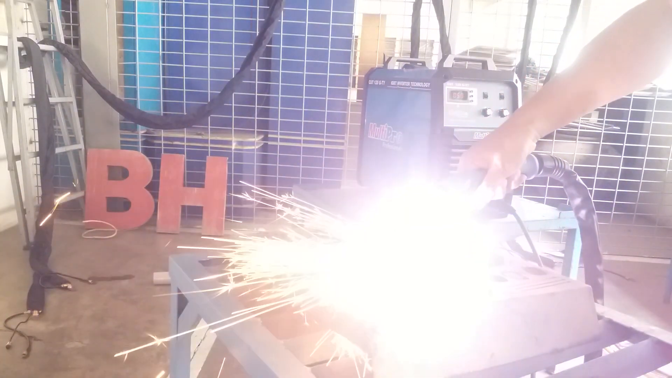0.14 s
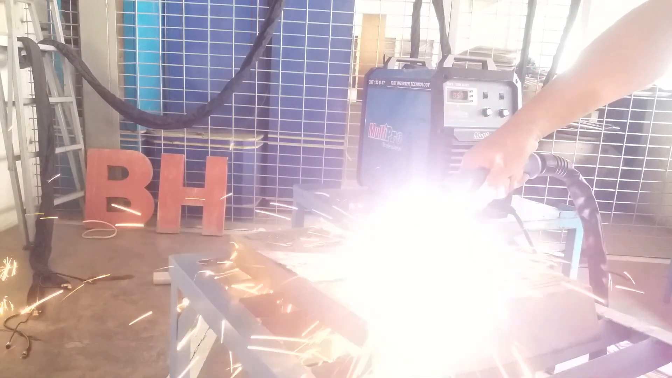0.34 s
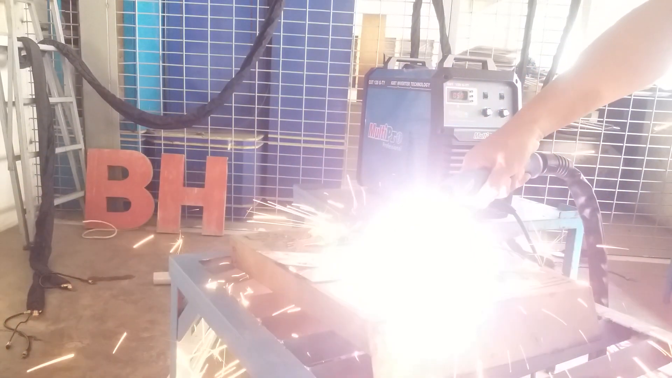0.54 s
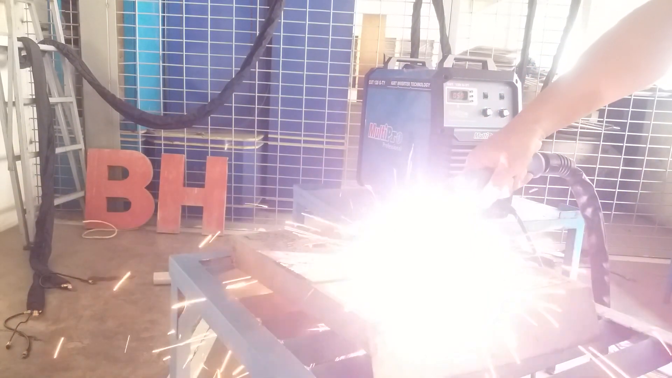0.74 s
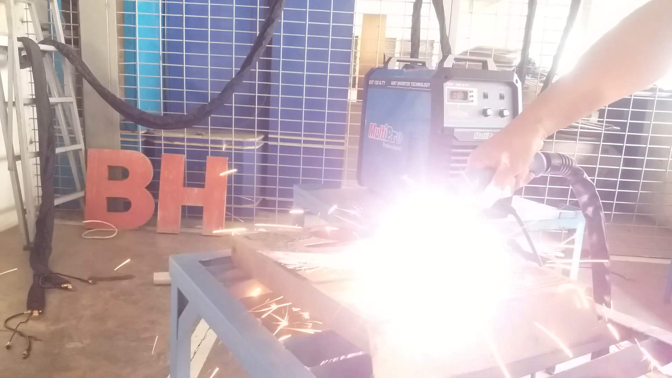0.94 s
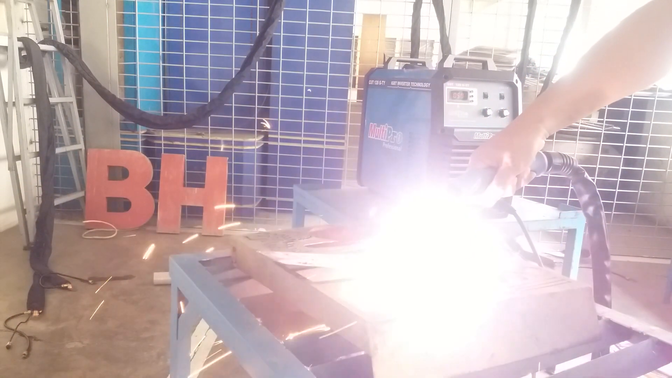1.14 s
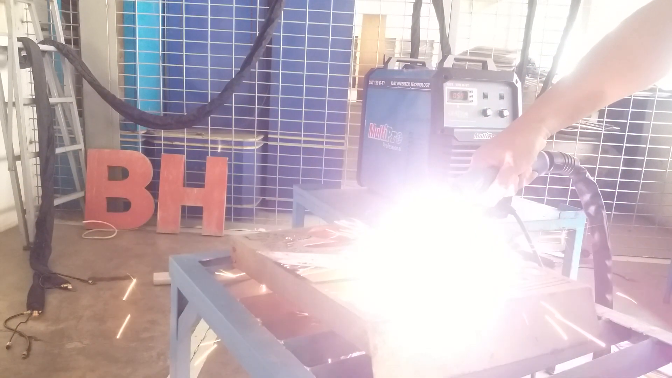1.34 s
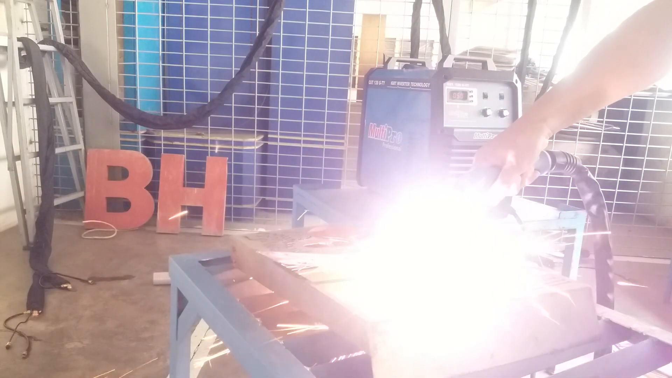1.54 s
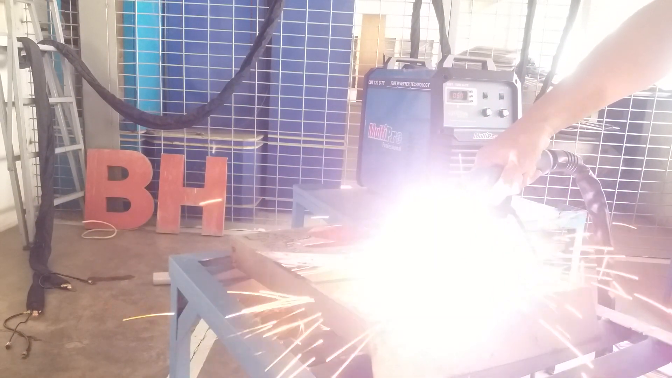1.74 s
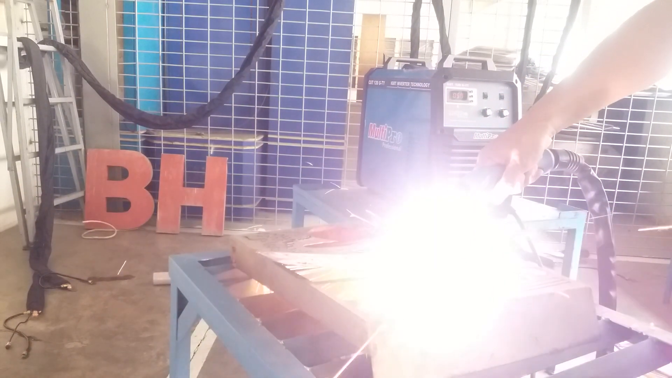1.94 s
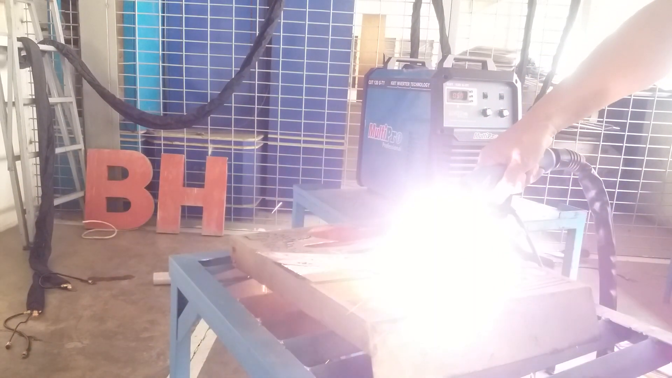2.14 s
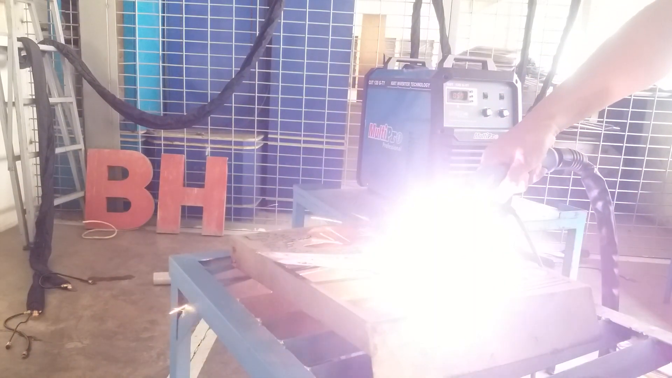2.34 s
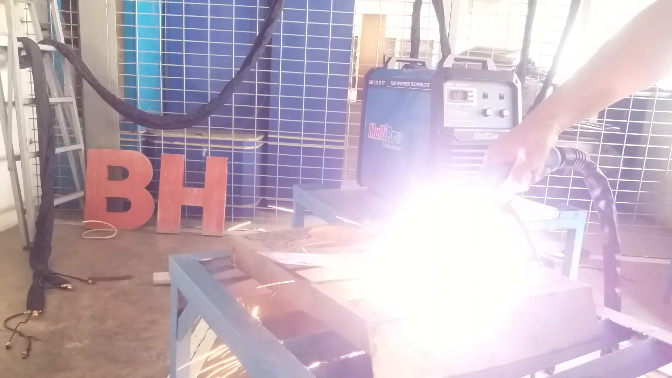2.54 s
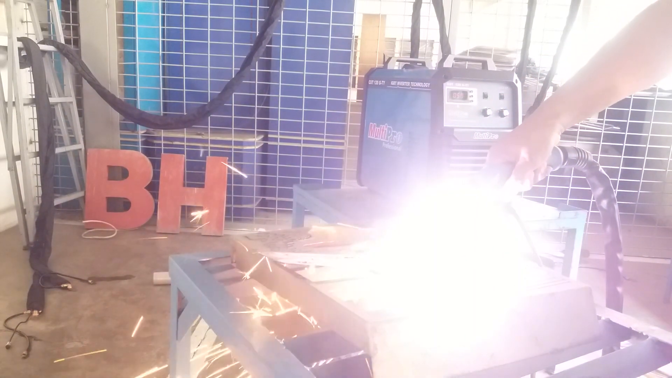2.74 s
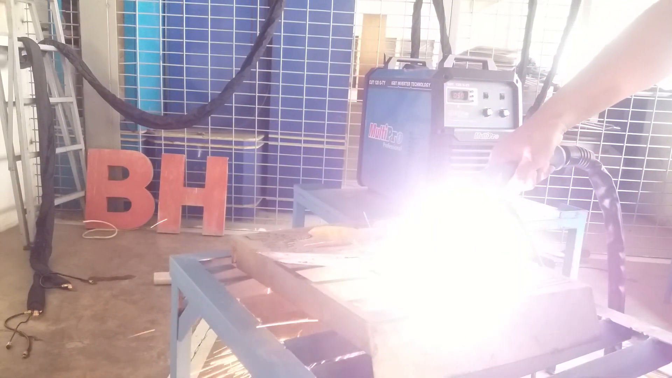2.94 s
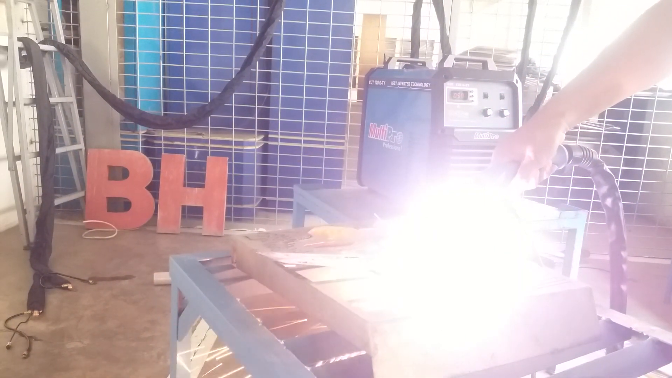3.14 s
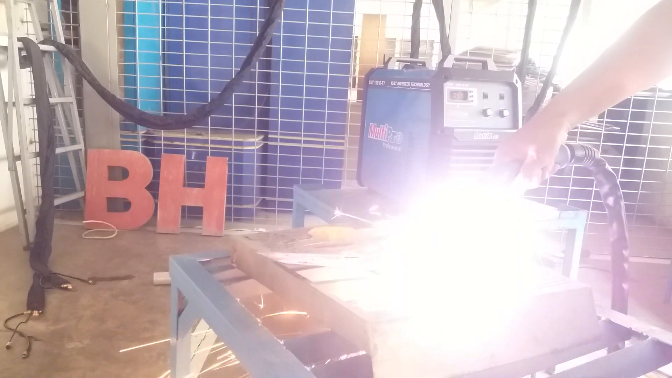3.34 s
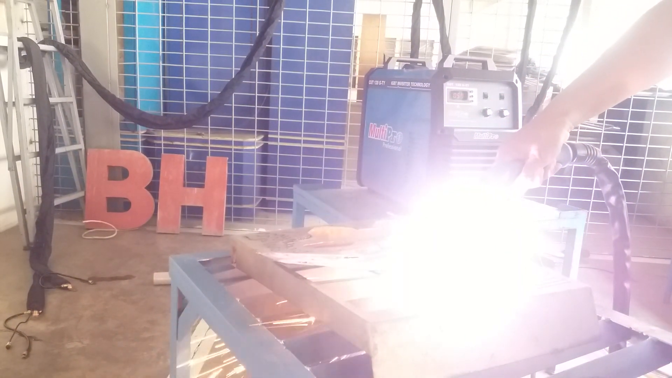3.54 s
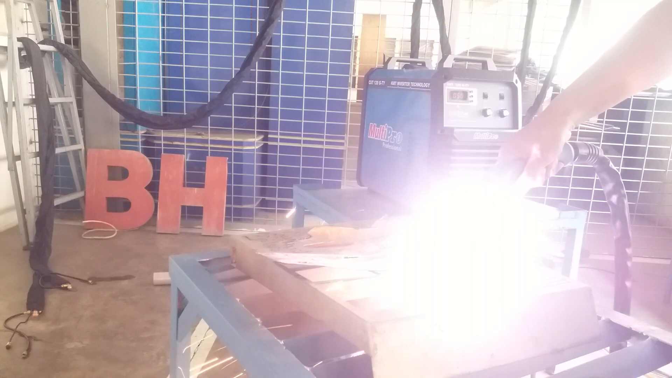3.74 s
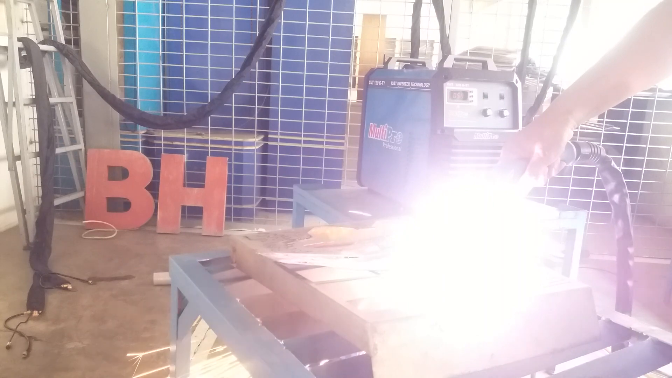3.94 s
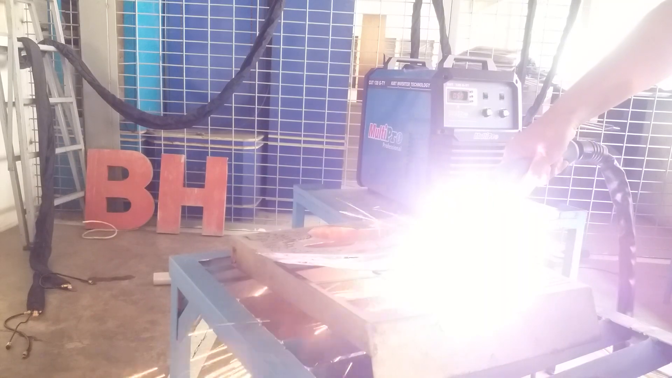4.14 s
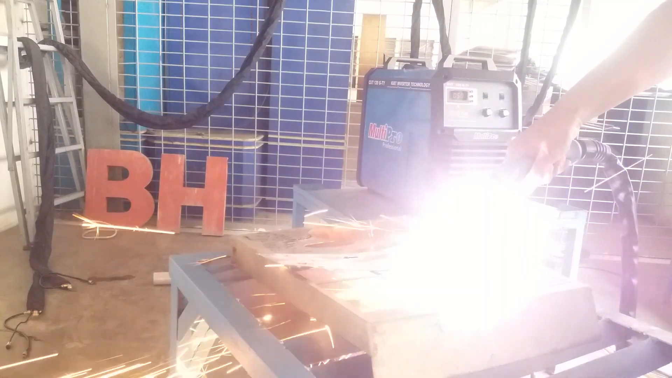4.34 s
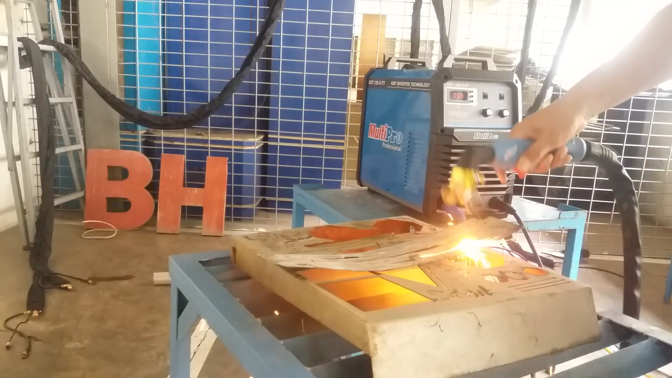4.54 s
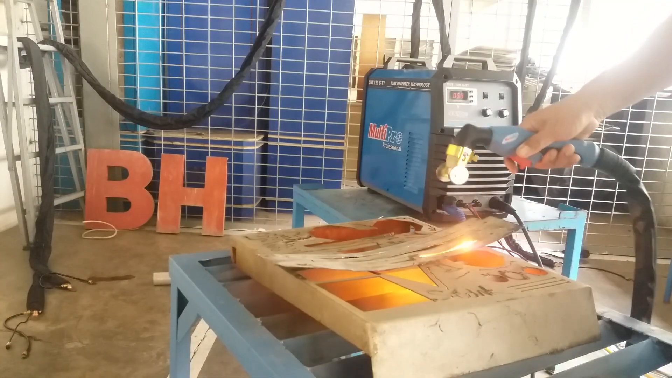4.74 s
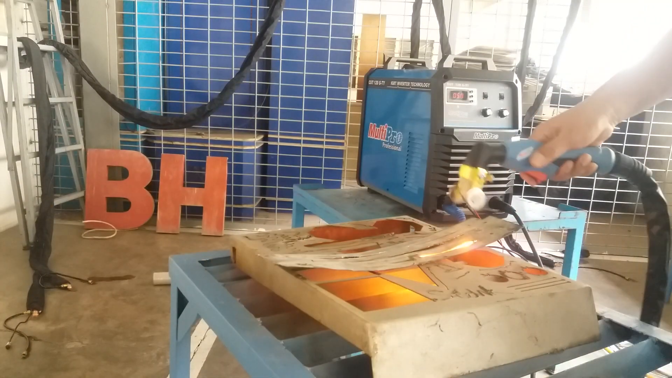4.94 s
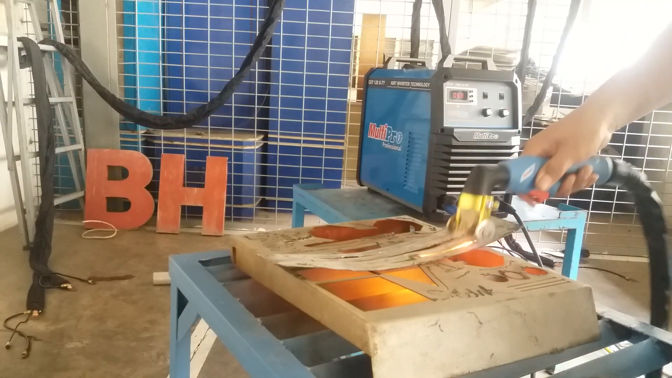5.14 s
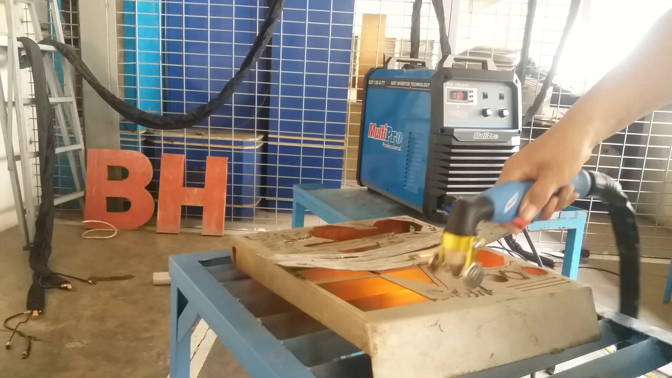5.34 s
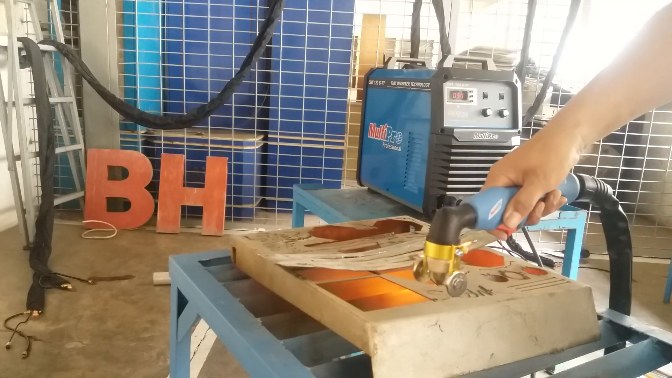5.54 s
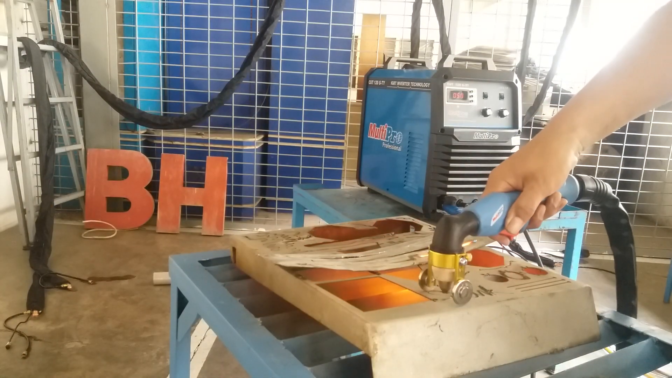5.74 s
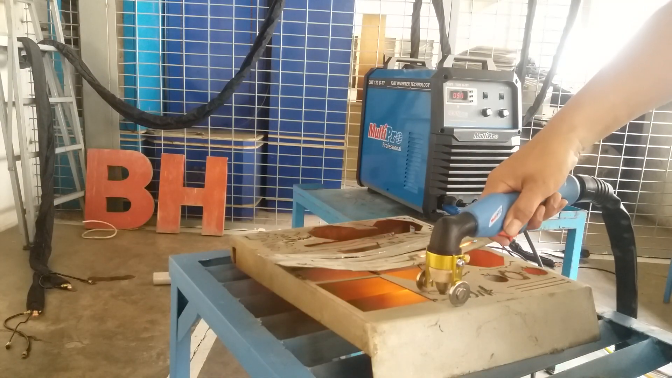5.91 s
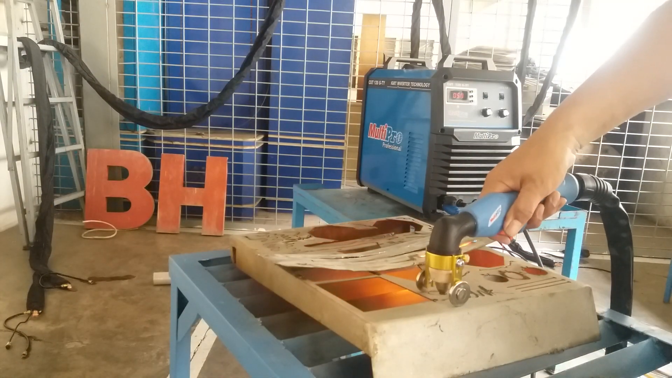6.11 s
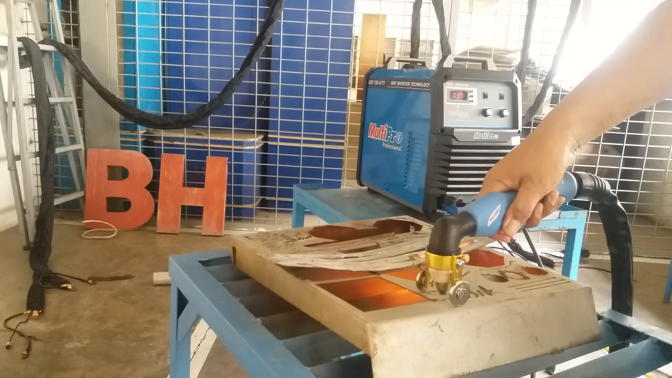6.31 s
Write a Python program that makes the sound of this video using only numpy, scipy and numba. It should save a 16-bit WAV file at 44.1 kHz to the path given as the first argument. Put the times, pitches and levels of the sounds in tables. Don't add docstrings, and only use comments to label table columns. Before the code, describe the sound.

Loud bright cutting-arc hiss with rough wind-like thumps stops with a pop at four and a half seconds, leaving soft airy hissing and low hum.

```python
import sys
import numpy as np
from scipy import signal
from scipy.fft import rfft, irfft, next_fast_len
from scipy.io import wavfile
from scipy.ndimage import uniform_filter1d, map_coordinates
from numba import njit

SR = 44100
rng = np.random.default_rng(int(sys.argv[2]) if len(sys.argv) > 2 else 0)


def inscribe(sig):
    pcm = np.round(np.clip(np.atleast_2d(sig).T, -1, 1) * 32767)
    wavfile.write(sys.argv[1], SR, pcm.astype(np.int16))


def volts_from_decibels(level):
    exponent = np.asarray(level, float) / 20
    return 10 ** exponent


N = 280900
SIZE = next_fast_len(N + SR)
HZ = np.arange(SIZE // 2 + 1) * SR / SIZE + 1
TIME = np.arange(N) / SR
BAND_CENTRES_HZ = 30 * 2 ** np.arange(0, 9.6, 0.5)

# (time [s], nozzle hiss [dB], kerf depth [dB])
ARC_LEVELS = [(0.0, -22.5, 0.5), (0.36, -21.5, -1.5), (0.57, -18.5, -0.5), (0.82, -21.5, .1),
              (0.95, -19.5, -3.5), (1.1, -21.5, -1.5), (1.19, -19.5, -1.5), (1.25, -22.5, -1),
              (1.36, -20, -0.6), (1.57, -21.5, -1.5), (1.8, -19, 0), (2.25, -20, 0.5), (2.9, -19, -1),
              (3.0, -21, -0.6), (3.54, -20.5, 0.2), (3.97, -18, -1), (4.28, -21, .2), (4.38, -18, -1.7)]
# (frequency [Hz], level [dB per Hz])
ARC_SPECTRUM = [(30, -43), (60, -29), (150, -35), (400, -13.5), (900, -7.5), (1600, -2.5), (2600, -4),
                (4200, -3.5), (5600, -6.5), (7200, -3.5), (9500, -4), (12000, 2), (15800, -1.5)]
ARC_OFF_S, ARC_SNAP_DB, ARC_POP_DB = 4.458, -14, -7.5
HISS_SHARE_IN_KERF, PIERCE_DB, PIERCE_S = 0.25, 3.5, 0.068
KERF_HZ, KERF_WANDER = 2670, 0.017

# (frequency [Hz], T60 [s])
ROOM_T60_S = [(100, 0.64), (1000, 0.6), (4000, 0.64), (12000, 0.28)]
ROOM_DB, ROOM_ALIKE_HZ, LEFT_LAG_S = 7.5, 1050, 0.00007
# (delay [s], level [dB])
NEAR_ECHOES = [(.0009, -9.5), (.0021, -9.5), (.0047, -8.5), (.0083, -2.5), (0.0131, -3.5)]

# (time [s], left notch [Hz], right notch [Hz])
BODY_SHADOW = [(0.3, 5600, 8560), (1.2, 4900, 8100), (2.0, 5100, 7950), (2.7, 6000, 7400),
               (3.5, 5600, 8400), (4.301, 5200, 7800), (4.7, 6000, 7400), (5.5, 5900, 7900),
               (6.2, 5900, 8400)]
SHADOW_DEPTH, SHADOW_WIDTH_HZ = 0.29, 770
# (frequency [Hz], gain [dB])
LEFT_PORT = [(60, -6.5), (1300, -1), (2800, 1), (4400, -2), (5800, -4), (7800, -1), (10000, 0.5),
             (15000, 4.5)]
RIGHT_PORT = [(60, -6), (1300, 0), (2800, -1.5), (4400, 3.5), (5800, 3), (7800, -9.5), (10000, -2.5),
              (15000, 2.5)]

# (middle [s], half length [s], level [dB])
LEFT_GUSTS = [(0.2, 0.061, -37), (0.6, 0.05, -44), (1.3, 0.08, -44), (1.65, 0.068, -40), (1.87, 0.088, -42),
              (2.3, 0.089, -42), (2.75, 0.063, -33), (2.87, 0.07, -30), (3.1, 0.08, -41), (3.9, 0.057, -32),
              (4.12, 0.08, -43), (4.4, 0.1, -47)]
RIGHT_GUSTS = [(0.23, 0.081, -39.5), (0.6, 0.04, -34), (0.78, 0.04, -32), (1.0, 0.085, -28),
               (1.2, 0.12, -24.5), (1.45, 0.039, -28.5), (1.6, 0.1, -23), (1.79, 0.039, -26),
               (1.92, 0.044, -28.5), (2.13, 0.026, -26.5), (2.29, 0.14, -31), (2.59, 0.08, -28.5),
               (2.78, 0.074, -26.5), (2.92, 0.066, -28), (3.17, 0.17, -26.5), (3.39, 0.037, -32),
               (3.62, 0.056, -32.5), (3.76, 0.047, -26.5), (3.92, 0.15, -26), (4.09, 0.065, -26),
               (4.3, 0.095, -32), (4.44, 0.073, -29)]
LEFT_CALM_DB, RIGHT_CALM_DB = -50.5, -42.5
# (time [s], peak [dB], length [ms])
LEFT_EDDIES = [(0.192, -16, 0.46), (0.212, -9, 0.55), (0.595, -16.5, 1), (0.602, -11, 0.48),
               (1.904, -16, 0.48), (2.31, -8.5, 0.79), (2.724, -14, 0.63), (2.777, -16, 1),
               (2.791, -9, 0.58), (2.835, -15, 0.66), (2.886, -5.5, 0.35), (2.933, -9, 0.63),
               (3.642, -25, 0.51), (4.1, -20, 0.49), (4.136, -14, 0.62), (4.428, -15, 0.62)]
RIGHT_EDDIES = [(1.049, -6, 0.36), (1.07, -10, 0.61), (1.135, -4.5, 0.56), (1.183, -5.5, 0.41),
                (1.193, -9.5, 0.82), (1.232, -10, 0.46), (1.261, -8, 0.78), (1.273, -5, 0.56),
                (1.419, -8, 0.55), (1.44, -6.5, 0.63), (1.585, -4, 0.4), (1.615, -6, 0.8),
                (1.812, -10, 0.47), (2.109, -10, 0.71), (2.269, -5, 0.37), (2.467, -8, 0.39),
                (2.567, -9, 0.57), (2.596, -7, 0.49), (2.621, -6, 0.45), (2.921, -6, 0.42),
                (3.165, -5, 0.38), (3.307, -9.5, 0.81), (3.399, -5.5, 0.83), (3.402, -14, 3.3),
                (3.718, -11, 0.64), (3.978, -14, 0.64), (4.02, -11, 0.59), (4.072, -7, 0.66),
                (4.113, -15, 1.1), (4.362, -15, 0.82)]
EDDY_GAP_S, EDDY_OVER_GUST_DB, EDDY_SCATTER_DB = 0.011, 8.5, 5
EDDY_MS, EDDY_MS_SPREAD = 0.56, 0.39
# (frequency [Hz], level [dB per Hz])
BUFFET_SPECTRUM = [(25, -50), (45, -10), (75, -1.5), (200, -3), (500, -3.5), (1000, -6), (2000, -8),
                   (4000, -27)]

# (time [s], nozzle hiss [dB], splash on the sheet [dB], splash centre [Hz])
AIR_LEVELS = [
    (4.9, -36, -46.5, 1400),
    (5.16, -34, -40.5, 1400),
    (5.234, -33.5, -32, 1090),
    (5.312, -34.5, -35, 1540),
    (5.474, -34.5, -35, 1820),
    (5.55, -34, -28, 1930),
    (5.722, -28, -32.5, 1770),
    (5.982, -32, -30.5, 1830),
    (6.2, -30.5, -43, 1300),
]
# (frequency [Hz], level [dB per Hz])
AIR_SPECTRUM = [(30, -35), (60, -15), (150, -11), (300, -14), (600, -7), (1500, -22.5), (3000, -9.5),
                (4800, -16.5), (7000, -6), (9000, -20), (12000, -2.5), (15800, -8)]
# (frequency [Hz], width [Hz], level [dB])
HOLLOW_MODES = [(80, 94, -8.5), (192, 140, 1), (318, 80, -22), (454, 220, 6), (580, 57, -16)]
HOLLOW_FAR_DB, HOLLOW_DB, HOLLOW_GROWS_DB_S = -61, -41, 6.5
HOLLOW_OPENS_S, HOLLOW_RISE_S = 5.43, 0.3
FAN_HZ, FAN_DB, SHOP_DB = 121, -10.5, -34.5
SPRAY_DB, SPRAY_PEAK_S, SPRAY_RISE_DB_S, SPRAY_FALL_DB_S = -30, 5.722, 36, 29

TOP_HZ = 15720


def unit(x):
    return x / np.sqrt(np.mean(x ** 2))


def at(table, hz):
    table = np.array(table)
    return np.interp(np.log(hz), np.log(table[:, 0]), table[:, 1])


def curves(table):
    s, *columns = np.transpose(table)
    return [np.interp(TIME, s, column) for column in columns]


def shape(x, gain):
    return irfft(rfft(x, SIZE) * gain, SIZE)[..., :N]


def walk(rate_hz):
    hold = int(SR / rate_hz)
    steps = np.repeat(rng.standard_normal(N // hold + 1), hold)
    slewed = uniform_filter1d(uniform_filter1d(steps, hold), hold)
    return unit(slewed[:N])


def half_octave(hz):
    return np.clip(1 - 2 * np.abs(np.log2(HZ / hz)), 0, 1)


def bands(spectrum):
    noise = rfft(rng.standard_normal(SIZE)) * volts_from_decibels(at(spectrum, HZ))
    noise = noise / np.std(irfft(noise * (HZ > 9000) * (HZ < 15500), SIZE))
    for hz in BAND_CENTRES_HZ:
        yield hz, irfft(noise * half_octave(hz), SIZE)[:N]


@njit
def svf(x, hz, width_hz):
    y, band, low = np.empty(len(x)), 0., 0.
    for i in range(len(x)):
        g, k = np.tan(np.pi * hz[i] / SR), width_hz[i] / hz[i]
        v = (band + g * (x[i] - low)) / (1 + g * (g + k))
        band, low, y[i] = 2 * v - band, low + 2 * g * v, k * v
    return y


def late(x, delay_s):
    return map_coordinates(x, [np.arange(N) - delay_s * SR], order=3, mode="mirror")


def arc_off():
    since_s = TIME - ARC_OFF_S
    noise = svf(rng.standard_normal(N), 1100.0 + 0 * TIME, 4400.0 + 0 * TIME)
    snap = np.exp(-(since_s / 0.0034) ** 2) * unit(noise)
    pop_ms = since_s * 1000 - 1.2
    pop = np.cos(2 * np.pi * 0.81 * pop_ms) * np.exp(-(pop_ms / 0.61) ** 2)
    return volts_from_decibels(ARC_SNAP_DB) * snap + volts_from_decibels(ARC_POP_DB) * pop


def arc(split_hz=6500, flicker_db=0.36, sputter_db=0.43, kerf_db=-3):
    hiss_db, depth_db = curves(ARC_LEVELS)
    roar_db = depth_db + (HISS_SHARE_IN_KERF - 1) * (hiss_db - hiss_db.mean())
    roar_db = roar_db + PIERCE_DB * np.exp(-TIME / PIERCE_S)
    kerf_hz = KERF_HZ * (1 + KERF_WANDER * walk(5.13))
    sputter = sputter_db * walk(9)
    jet = 0
    for hz, band in bands(ARC_SPECTRUM):
        kerf_share = 1 / (1 + (hz / split_hz) ** 4)
        jet = jet + band * volts_from_decibels(hiss_db + kerf_share * roar_db + sputter + flicker_db * walk(12))
    jet = jet + volts_from_decibels(kerf_db) * svf(jet, kerf_hz, 0.35 * kerf_hz)
    burning = np.clip((ARC_OFF_S - TIME) / 0.0023, 0, 1)
    return jet * burning + arc_off()


def room(x, wander=0.02514):
    spectrum = rfft(x, SIZE)
    mid, side = rfft(rng.standard_normal((2, SIZE)))
    alike = 1 / (1 + (HZ / ROOM_ALIKE_HZ) ** 2)
    diffuse = mid * np.sqrt((1 + alike) / 2) + side * np.sqrt((1 - alike) / 2) * np.array([[1], [-1]])
    tail = 0
    for hz in BAND_CENTRES_HZ:
        gain = half_octave(hz)
        power = irfft(spectrum * gain, SIZE)[:N] ** 2
        keep = np.exp(-2 * np.log(1000) / (at(ROOM_T60_S, hz) * SR))
        energy = signal.lfilter([1 - keep], [1, -keep], power, zi=[power[:SR // 8].mean()])[0]
        tail = tail + np.sqrt(energy) * unit(irfft(diffuse * gain, SIZE)[:, :N])
    near = np.array([late(x, LEFT_LAG_S + 0 * TIME), x])
    for delay_s, db in NEAR_ECHOES:
        path_s = delay_s * (1 + wander * walk(0.8))
        near = near + volts_from_decibels(db) * np.array([late(x, path_s), late(x, 1.13 * path_s)])
    return (near + volts_from_decibels(ROOM_DB) * tail) / np.sqrt(1.26 + volts_from_decibels(2 * ROOM_DB))


def body_shadow(x):
    width_hz = SHADOW_WIDTH_HZ + 0 * TIME
    notches_hz = curves(BODY_SHADOW)
    return np.array([port - SHADOW_DEPTH * svf(port, hz, width_hz) for port, hz in zip(x, notches_hz)])


def gusts(table, calm_db):
    power = sum(volts_from_decibels(2 * db) * np.exp(-((TIME - s) / half_s) ** 2) for s, half_s, db in table)
    return 10 * np.log10(power + volts_from_decibels(2 * calm_db))


def shed_eddies(blast_db):
    chance = rng.standard_normal((int(ARC_OFF_S / EDDY_GAP_S), 3))
    s = np.abs(np.arange(len(chance)) + 0.5 * chance[:, 0]) * EDDY_GAP_S
    db = np.interp(s, TIME, blast_db) + EDDY_OVER_GUST_DB
    db = db + EDDY_SCATTER_DB * np.minimum(chance[:, 1], 1)
    ms = EDDY_MS * np.exp(EDDY_MS_SPREAD * chance[:, 2])
    return list(zip(s, db, ms))


def eddy_push(eddies, lead=1.0, width=0.39):
    push = np.zeros(N + SR)
    t_ms = np.arange(-300, 300) / SR * 1000
    chance = rng.uniform(-1, 1, (len(eddies), 2))
    for (s, db, ms), (sign, sag) in zip(eddies, chance):
        bump = np.exp(-(t_ms / (width * ms)) ** 2)
        bump = bump - lead * np.exp(-((t_ms + 0.95 * ms) / (0.18 * ms)) ** 2)
        bump = bump + 0.5 * sag * np.exp(-((t_ms - 1.5) / 0.28) ** 2)
        after = np.clip(t_ms / ms, 0, None)
        swirl = np.sin(2.73 * np.log(1 + after / 0.7))
        bump = bump - 0.65 * swirl * np.exp(-after / 4.7) * (after > 0)
        start = int(s * SR)
        push[start:start + len(t_ms)] += np.sign(sign) * volts_from_decibels(db) * bump
    return push[len(t_ms) // 2:][:N]


def buffet(blast_db, big_eddies, below_db=2, gusty_db=4.5, wake_s=0.017, calm=1.0):
    push = eddy_push(big_eddies + shed_eddies(blast_db))
    keep = np.exp(-1 / (wake_s * SR))
    wake = signal.lfilter([1 - keep], [1, -keep], np.abs(push))
    floor = calm ** 2 * wake.mean()
    wake = (floor + wake) / (floor + uniform_filter1d(wake, size=SR // 8))
    rumble = unit(shape(rng.standard_normal(N), volts_from_decibels(at(BUFFET_SPECTRUM, HZ))))
    rumble = unit(rumble * np.sqrt(wake) * volts_from_decibels(gusty_db * walk(130)))
    rumble = rumble * volts_from_decibels(blast_db + below_db)
    blowing = np.clip((ARC_OFF_S + 0.034 - TIME) / 0.033, 0, 1)
    vent = signal.butter(4, 60, "high", fs=SR, output="sos")
    return signal.sosfilt(vent, (rumble + push) * blowing)


def air_hiss(hiss_db, flicker_db=2.0, split_hz=5000):
    hiss = 0
    for hz, band in bands(AIR_SPECTRUM):
        shop_share = 1 / (1 + (hz / split_hz) ** 3)
        hiss = hiss + band * volts_from_decibels(hiss_db + shop_share * (SHOP_DB - hiss_db) + flicker_db * walk(11))
    return hiss


def air_splash(splash_db, splash_hz, width=0.65):
    splash = svf(rng.standard_normal(N), splash_hz, width * splash_hz)
    splash = svf(splash, splash_hz, 1.4 * splash_hz)
    spray = svf(rng.standard_normal(N), 2.0 * splash_hz, 1.0 * splash_hz)
    since_s = TIME - SPRAY_PEAK_S
    spray_db = SPRAY_DB + np.minimum(SPRAY_RISE_DB_S * since_s, -SPRAY_FALL_DB_S * since_s)
    return volts_from_decibels(splash_db) * unit(splash) + volts_from_decibels(spray_db) * unit(spray)


def hollow_hum():
    hollow_db = np.interp(TIME, [HOLLOW_OPENS_S, HOLLOW_OPENS_S + HOLLOW_RISE_S], [HOLLOW_FAR_DB, HOLLOW_DB])
    hollow_db = hollow_db + HOLLOW_GROWS_DB_S * np.clip(TIME - HOLLOW_OPENS_S, 0, None)
    noise = rng.standard_normal(N)
    drift = 1 + 0.037 * walk(6)
    hollow = 0
    for hz, width_hz, db in HOLLOW_MODES:
        hollow = hollow + volts_from_decibels(db + 1.1 * walk(16)) * svf(noise, hz * drift, width_hz * drift)
    fan = volts_from_decibels(FAN_DB + 1.7 * walk(6.8)) * np.sin(2 * np.pi * FAN_HZ * TIME)
    return volts_from_decibels(hollow_db) * (unit(hollow) + fan)


def cooling_air():
    hiss_db, splash_db, splash_hz = curves(AIR_LEVELS)
    return air_hiss(hiss_db) + air_splash(splash_db, splash_hz) + hollow_hum()


def scene():
    ports = volts_from_decibels(np.array([at(LEFT_PORT, HZ), at(RIGHT_PORT, HZ)]))
    torch = shape(body_shadow(room(arc() + cooling_air())), ports)
    left = buffet(gusts(LEFT_GUSTS, LEFT_CALM_DB), LEFT_EDDIES)
    right = buffet(gusts(RIGHT_GUSTS, RIGHT_CALM_DB), RIGHT_EDDIES)
    return volts_from_decibels(2.0) * torch + np.array([left, right])


def band_limit(x):
    return signal.sosfilt(signal.butter(12, 17080, fs=SR, output="sos"), x)


def record(dry):
    overloaded = np.tanh(0.55 * dry) / 0.66
    mix = shape(overloaded, HZ < TOP_HZ)
    return band_limit(mix)


dry = scene()
out = record(dry)
inscribe(out)
```